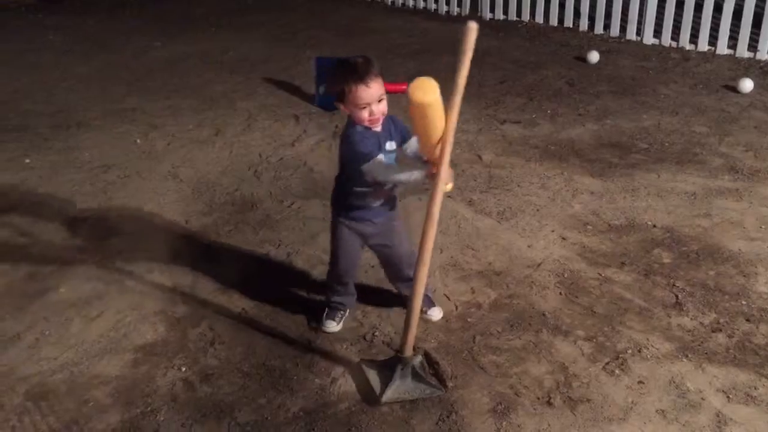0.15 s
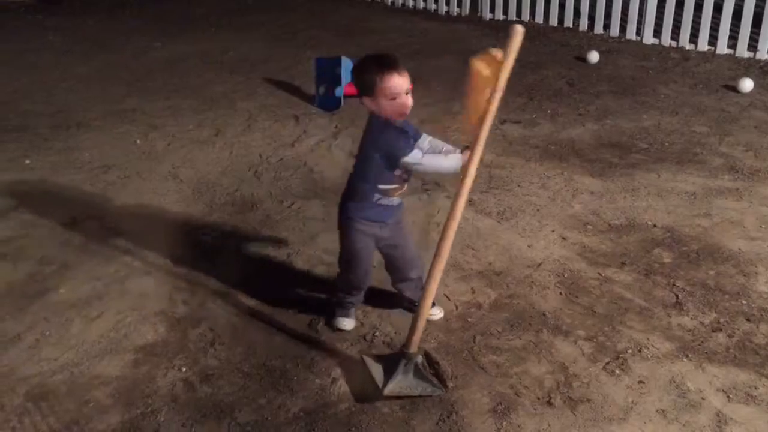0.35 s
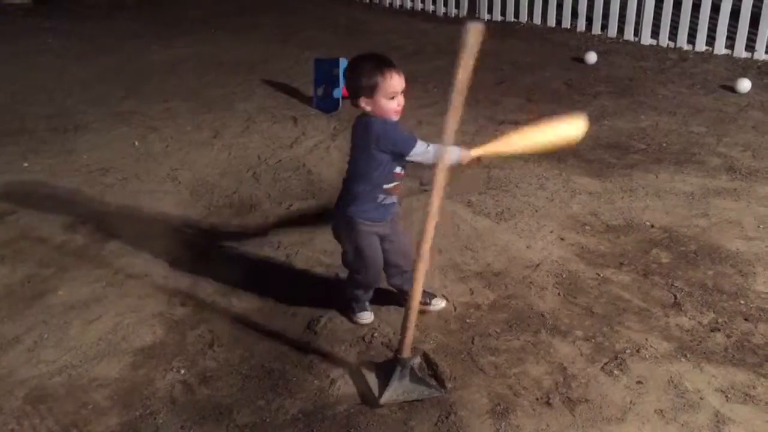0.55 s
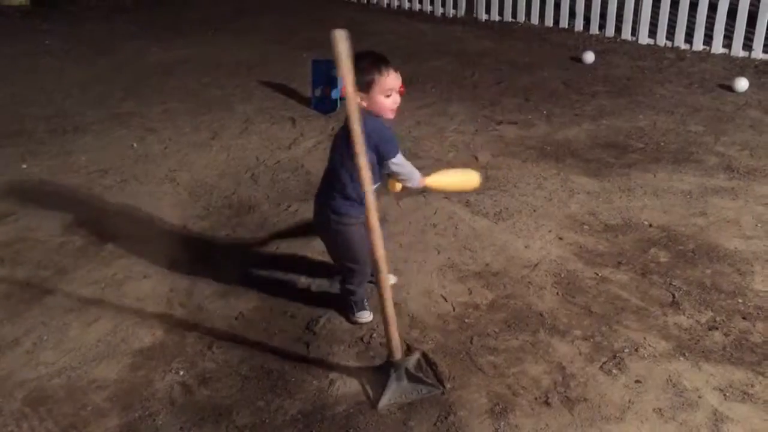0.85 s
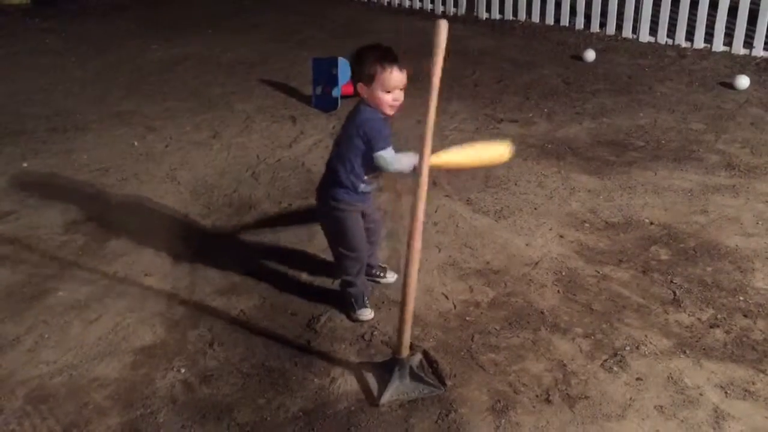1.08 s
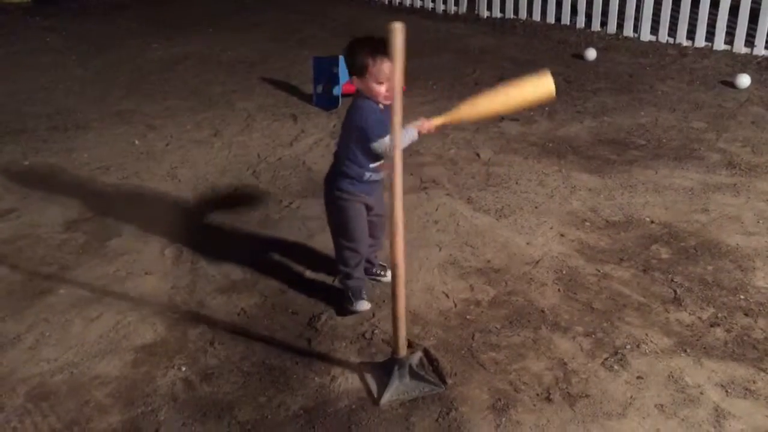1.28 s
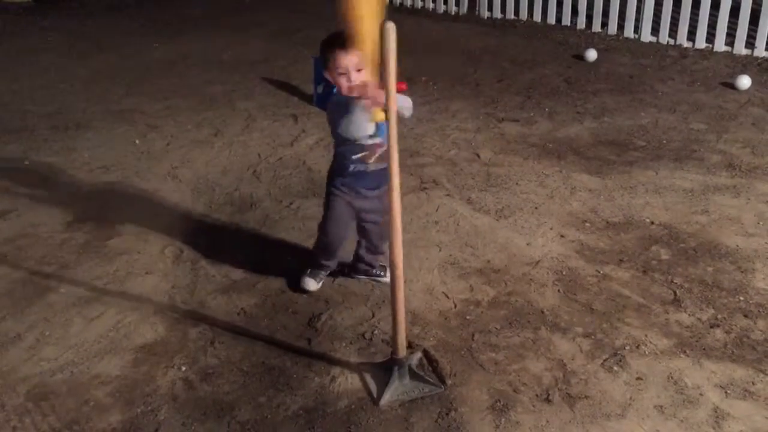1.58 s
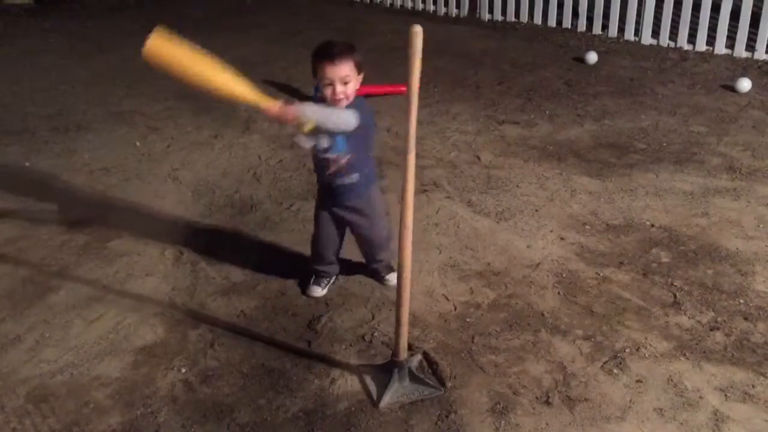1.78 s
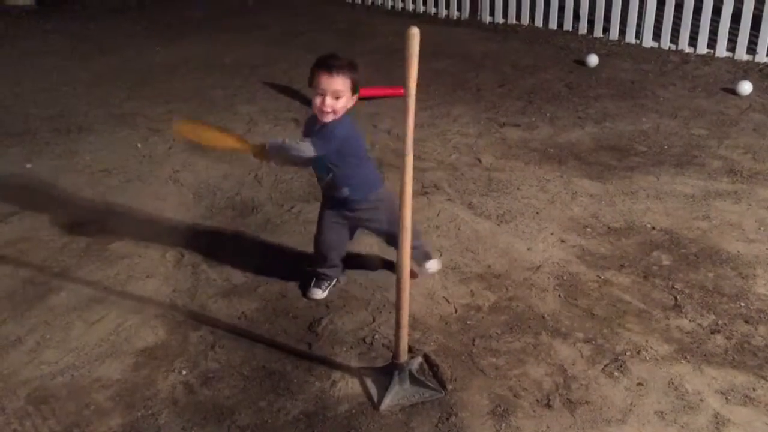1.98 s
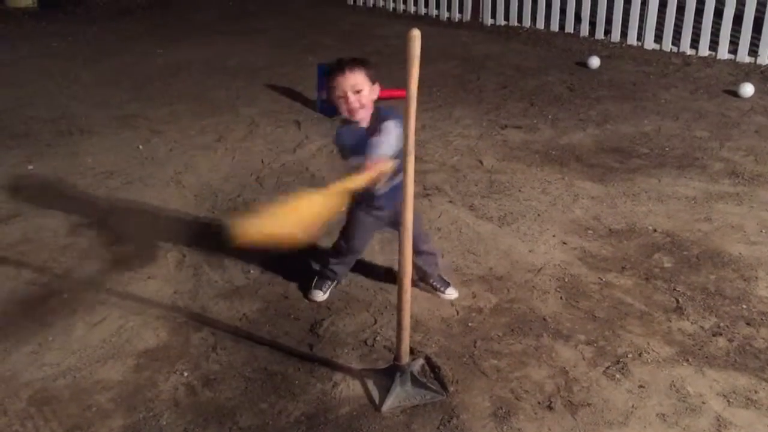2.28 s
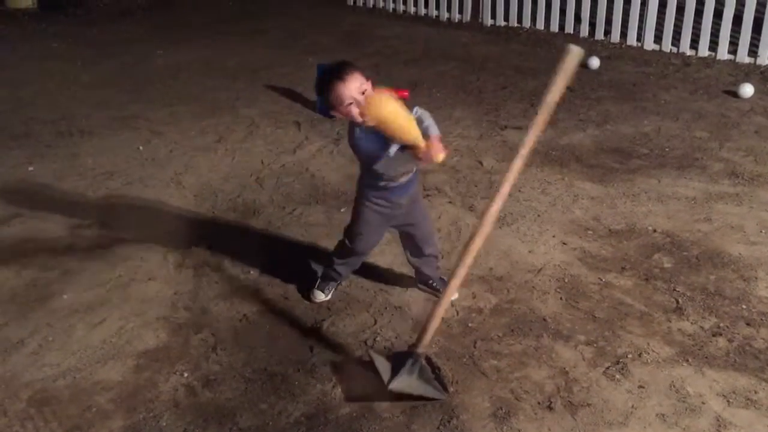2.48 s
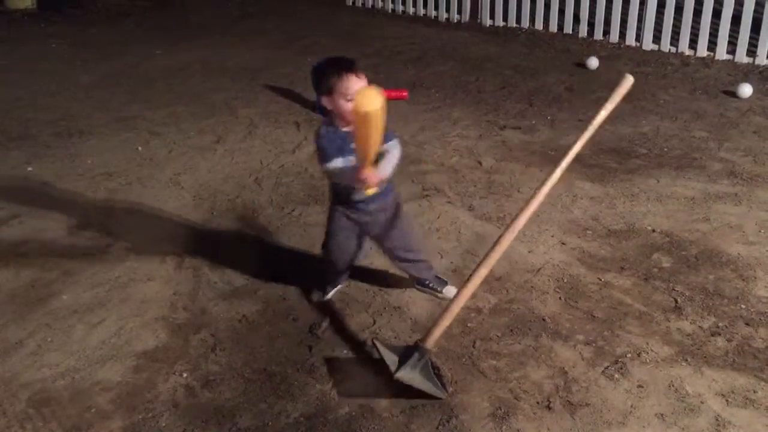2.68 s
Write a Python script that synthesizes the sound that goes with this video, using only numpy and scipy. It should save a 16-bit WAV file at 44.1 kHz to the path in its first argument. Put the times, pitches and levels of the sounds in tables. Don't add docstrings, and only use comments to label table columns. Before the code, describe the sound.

Quiet rubbing and wooden knocks, then one loud sharp plastic bat whack on a rattling wooden pole.

```python
import sys
import numpy as np
from scipy import signal
from scipy.fft import rfft, irfft
from scipy.io import wavfile
from scipy.ndimage import uniform_filter1d

SR = 44100
rng = np.random.default_rng(int(sys.argv[2]) if len(sys.argv) > 2 else 0)


def unload_wav(signal):
    wavfile.write(
        sys.argv[1],
        SR,
        np.round(np.clip(np.atleast_2d(signal).T, -1, 1) * 32767).astype(np.int16),
    )


def volts_from_db(level):
    exponent = np.asarray(level, float) / 20
    return 10 ** exponent


N = 125685
TIME = np.arange(N) / SR
SILENT_DB = -110


def read(points, hz):
    f, value = np.transpose(points)
    return np.interp(np.log(hz + 1), np.log(f + 1), value)


def evened(x):
    return x / np.sqrt(np.mean(x ** 2) + 1e-20)


def add(mix, s, sound):
    part = mix[round(s * SR):][:len(sound)]
    part += sound[:len(part)]


def high_pass(x, order, hz):
    return signal.sosfilt(signal.butter(order, hz, "high", fs=SR, output="sos"), x)


def noise(shape_db, size, patchy_db, flicker_db):
    frames = 4 * N // size + 5
    hz = np.fft.rfftfreq(size, 1 / SR)[:, None]
    real, imag, patches = rng.standard_normal((frames, len(hz), 3)).T
    patches = uniform_filter1d(uniform_filter1d(patches, size=3, axis=0), size=9, axis=1)
    patches = evened(patches)
    flicker = evened(uniform_filter1d(rng.standard_normal(frames), size=3))
    gain = volts_from_db(shape_db(hz, np.arange(frames) * size / 4 / SR) + 0 * patches)
    gain = gain / np.sqrt((gain ** 2).mean(0))
    gain = gain * volts_from_db(patchy_db * patches + flicker_db * flicker)
    sound = signal.istft((real + 1j * imag) * gain, nperseg=size, noverlap=3 * size // 4)[1]
    return evened(sound[:N])


def puff(db, hz, t60, narrow_db, rise):
    t, f = np.arange(8192) / SR, np.fft.rfftfreq(8192, 1 / SR)
    band = volts_from_db(-narrow_db * np.log2((f + 1) / hz) ** 2)
    hiss = evened(irfft(rfft(rng.standard_normal(8192)) * band))
    return hiss * volts_from_db(db - 60 * t / t60) * np.minimum(t / (rise + 1e-4), 1)


def ring(modes, gain_db, contact_ms, share, bend):
    hz, db, t60 = np.transpose(modes)[..., None]
    t = np.arange(SR // 4) / SR
    detune, phase, mate_detune, mate_phase = rng.random((4, len(modes), 1))
    decay_db = 60 * (t / np.maximum(share * t60, .003)) ** bend
    onset = 1 - np.exp(-t / (contact_ms / 1000 + 1e-4))
    fade = volts_from_db(db + gain_db(hz) - decay_db) * onset
    main_hz = hz * (1 + 0.0095 * (detune - .5))
    mate_hz = hz * (1 + 2 * 0.0335 * (2 * mate_detune - 1))
    main = np.sin(2 * np.pi * (main_hz * t + phase))
    mate = np.sin(2 * np.pi * (mate_hz * t + mate_phase))
    return (fade * (main + volts_from_db(-8) * mate)).sum(0)


# f/Hz, level/dB, t60/s
BAT_MODES = [(412, -6.5, 0.023), (842, -5.5, 0.036), (1175, -7, 0.05), (1576, -2.5, 0.076),
             (2100, -1, 0.0478), (2464, -0.5, 0.023), (3560, 2.5, 0.014), (4760, -22.5, 0.0092),
             (5280, -2.5, 0.00693), (6000, -10.5, 0.0056), (7170, -14, 0.012), (8300, -12, 0.012),
             (10670, -25.5, 0.0033), (13600, -23.5, 0.0079)]
# t/s, shell level/dB, crack level/dB, tilt/dB per octave
BLOWS = [
    (2.4751, -13.5, 3.5, -3),
    (2.481, -18.5, -24, -3.5),
    (2.4938, -13, -23, 0.5),
    (2.4974, -21, -17.5, 2.5),
    (2.514, -27.5, -27.5, -4.5),
    (2.5182, -22, -26.5, 2.5),
    (2.528, -35, -35, 2),
]
# f/Hz, level/dB
CRACK_COLOUR = [(200, -44), (600, -24.5), (1500, -19), (3900, -10), (5800, 8), (7500, -5.5), (10500, -14),
                (13500, -10.5), (16500, -17)]


def bat():
    out, t = np.zeros(N), np.arange(2048) / SR
    colour_db = read(CRACK_COLOUR, np.abs(np.fft.fftfreq(2048, 1 / SR)))
    snap = np.fft.ifft(np.exp(np.conj(signal.hilbert(np.log(volts_from_db(colour_db)))))).real
    snap = snap[:400] / np.linalg.norm(snap) / 2
    crack_t60, snap_db = .0055, 15
    for s, shell_db, crack_db, tilt in BLOWS:
        shell_gain = lambda f: shell_db + tilt * np.log2(f / 2000)
        add(out, s, ring(BAT_MODES, shell_gain, contact_ms=0.23, share=0.85, bend=0.99))
        hiss = evened(irfft(rfft(rng.standard_normal(2048)) * volts_from_db(colour_db[:1025])))
        add(out, s, hiss * volts_from_db(crack_db - 6 - 60 * t / crack_t60) * np.minimum(t / 0.0005, 1))
        add(out, s + .0003, volts_from_db(crack_db + snap_db) * snap)
    return out


# f/Hz, level/dB, t60/s
POLE_MODES = [(143.5, -7, 0.068), (318, -1.5, 0.074), (621, -1, 0.093), (781, -7, 0.063),
              (1122, -0.5, 0.074), (1650, -3.5, 0.073), (1979, -7, 0.072), (2242, 2, 0.048),
              (2418, -8.5, 0.04), (2920, 0.5, 0.037), (3640, -3, 0.031), (4255, -3, 0.033),
              (5140, 0, 0.017), (6400, 0, 0.05)]
# t/s, level/dB, best excited f/Hz, spread/octaves, share of free ring time
KNOCKS = [(0.411, -53, 900, 0.55, 1), (.462, -40.5, 2300, .6, 0.79), (.488, -49, 2200, 0.56, 0.32),
          (0.731, -52, 2520, 0.46, 0.55), (0.772, -51, 2100, 0.64, 0.66), (0.7848, -38, 1390, 0.98, .5),
          (0.799, -42.5, 310, 0.58, 0.99), (.797, -55.5, 3860, 0.53, 0.74), (0.804, -52, 1900, 0.71, 0.4),
          (0.822, -40, 2920, 0.18, 0.74), (.836, -49.5, 1600, 0.27, 0.26), (.847, -38.5, 2900, 0.23, 0.44),
          (1.035, -66, 2110, 0.7, 0.67), (1.0794, -65, 2100, 0.36, 0.8), (1.387, -58, 1600, 0.34, 1.8),
          (1.407, -60, 655, 1.1, 0.64), (1.543, -65, 1930, 0.22, 0.7), (2.477, -20, 1800, 0.9, 0.81),
          (2.4935, -5.5, 2100, 0.83, 0.28), (2.504, -23, 1470, 1.17, 0.83), (2.514, -26.5, 2850, 0.82, 1.2),
          (2.52, -14.5, 1650, 0.14, 0.91), (2.538, -24, 1650, 0.31, .5), (2.552, -38, 2000, 0.31, .6),
          (2.531, -36.5, 318, 0.28, 1.82), (2.559, -32, 159, 0.6, 1.03), (2.585, -38, 250, 0.71, 0.81),
          (2.616, -48, 330, .4, 0.79), (2.657, -47.5, 1900, 0.46, .6), (2.672, -45, 130, 0.48, 1.3),
          (2.706, -51, 1800, 0.2, 1.4), (2.745, -51, 2000, .3, 0.41),]


def pole():
    out, t = np.zeros(N), np.arange(600) / SR
    for s, db, hz, spread, share in KNOCKS:
        chatter = rng.standard_normal(600) * np.exp(-t / .004) * .025
        chatter[0] = 1
        place_gain = lambda f: db - 6 * (np.log2(f / hz) / spread) ** 2
        wood = ring(POLE_MODES, place_gain, contact_ms=3.44, share=share, bend=1.64)
        add(out, s, signal.fftconvolve(wood, chatter))
    return out


# t/s, level/dB
JUDDER = [
    (2.49, -30.5),
    (2.528, -33.5),
    (2.56, -46.5),
    (2.6, -63),
    (2.64, -60.5),
    (2.68, -61),
    (2.72, -61.5),
    (2.78, -70),
    (2.85, -66),
]
# f/Hz, level/dB
JUDDER_REACH = [(100, 9), (330, 2.5), (650, -12), (1100, -3.5), (1900, 3), (3000, -5), (6500, -7)]


def judder():
    s, db = np.transpose(JUDDER)
    jolts_per_s = 900
    jolts = rng.standard_normal(N) * volts_from_db(2.37 * rng.exponential(1, N))
    jolts = jolts * (rng.random(N) < jolts_per_s / SR)
    body = ring(POLE_MODES, lambda f: read(JUDDER_REACH, f), contact_ms=0.55, share=0.61, bend=0.88)
    level = volts_from_db(np.interp(TIME, s, db, left=SILENT_DB))
    return signal.fftconvolve(evened(jolts) * level, body / np.linalg.norm(body))[:N]


# start t/s, length/s, level/dB, from f/Hz, to f/Hz
ROCK = (.755, .065, -51, 150, 315)


def rock():
    s, length, db, low_hz, top_hz = ROCK
    out, u = np.zeros(N), np.arange(0, 1, 1 / (SR * length))
    hz = low_hz + (top_hz - low_hz) * np.minimum(u / 0.553, 1)
    add(out, s, volts_from_db(db) * np.sin(np.pi * u) * np.sin(2 * np.pi * np.cumsum(hz) / SR))
    return out


# t/s, level/dB
SPILL = [
    (2.477, -11),
    (2.499, -25),
    (2.529, -30),
    (2.559, -38),
    (2.6, -44.5),
    (2.661, -51),
    (2.69, -56),
    (2.72, -54.5),
    (2.85, -63),
]
# f/Hz, level/dB
RATTLE_COLOUR = [(35, -59), (90, -34.5), (150, -8), (400, -13), (700, -14), (1100, -5), (3580, -10.5),
                 (16000, -52)]
# f/Hz, level/dB
SOIL_COLOUR = [(50, -13.5), (100, -1.5), (320, -8), (720, -26), (1200, -9), (1850, 1), (3500, -9),
               (6500, -14.5)]


def spill():
    s, db = np.transpose(SPILL)
    settle_s, dull_hz, dull_db_per_octave = 0.12, 6500, -29.5

    def colour(hz, t):
        late = 1 - np.exp(-np.maximum(t - s[0], 0) / settle_s)
        soil = read(SOIL_COLOUR, hz) + dull_db_per_octave * np.log2(np.maximum(hz / dull_hz, 1))
        return read(RATTLE_COLOUR, hz) * (1 - late) + soil * late

    dirt = noise(colour, size=512, patchy_db=1.5, flicker_db=1.5)
    return dirt * volts_from_db(-2 + np.interp(TIME, s, db, left=SILENT_DB))


# t/s, level/dB, tilt/dB per octave
SLIDE = [(0, -63, 0), (.06, -62.5, 4.5), (.11, -59, -0.5), (.155, -53.5, -2), (0.203, -59.5, 1.5),
         (.225, -67, -2), (.27, -64, -1.5), (.33, -63.5, -1), (0.359, -55.5, 1.5), (0.4, -52, 2.5),
         (0.419, -46, 0.5), (0.448, -50, -0.5), (0.467, -43, 1.5), (0.489, -47, -0.5), (0.5, -60.5, -0.5),
         (0.551, -70.5, -3.5)]
# f/Hz, level/dB
RUB_COLOUR = [(71, -34), (120, -22), (184, 3), (427, -7.5), (503, -23.5), (1030, -7.5), (2290, -3.5),
              (5990, -14.5), (16000, -29)]
# f/Hz, width/Hz, level/dB
RUB_PEAKS = [(397, 67, 8), (739, 110, 17.5), (1067, 72, 8.5), (1800, 87, 8), (2350, 280, 2),
             (3600, 97, 9.5), (4530, 230, 1), (5900, 840, 10.5), (9000, 490, 5.5)]


def slide():
    s, db, tilt = np.transpose(SLIDE)

    def colour(hz, t):
        peaks = sum(d * np.exp(-((hz - f) / w) ** 2) for f, w, d in RUB_PEAKS)
        lean = np.interp(t, s, tilt) * np.log2(hz / 2000 + 0.025)
        return read(RUB_COLOUR, hz) + peaks + lean

    rub = noise(colour, size=512, patchy_db=4.0, flicker_db=1.03)
    grain = evened(uniform_filter1d(rng.standard_normal(N), size=70))
    return rub * volts_from_db(-0.17 * grain + np.interp(TIME, s, db, right=SILENT_DB))


# t/s, level/dB, f/Hz
TICKS = [(.008, -74, 9000), (0.016, -50, 13000), (0.023, -48, 13100), (.041, -74, 13000),
         (0.091, -46.5, 6500), (.119, -56, 12000), (0.144, -48, 6000), (.174, -47, 13300),
         (.183, -54, 14000), (.41, -52, 6200), (.489, -48, 8000), (.85, -59, 9000), (2.54, -40, 8060),
         (2.556, -43, 7000), (2.568, -47.5, 7960), (2.578, -37.5, 6900), (2.595, -39, 7000),
         (2.66, -47.5, 6000), (2.726, -52, 5070)]


def grit():
    out = np.zeros(N)
    for s, db, hz in TICKS:
        add(out, s, puff(db, hz, t60=0.011, narrow_db=26, rise=0.0015))
    return out


# t/s, level/dB, f/Hz, t60/s, rise/s
SCUFFS = [
    (0.594, -61.5, 1280, 0.088, 0.0033),
    (0.766, -63.5, 2440, 0.27, 0.015),
    (0.786, -48.5, 540, 0.081, 0.0023),
    (2.255, -60, 514, 0.13, 0.002),
    (2.4516, -54.5, 2100, 0.06, .002),
    (2.462, -47, 505, 0.27, .004),
]


def scuffs():
    out = np.zeros(N)
    for s, db, hz, t60, rise in SCUFFS:
        add(out, s, puff(db, hz, t60, 3.4, rise))
    return out


# t/s, level/dB, f/Hz, t60/s, rise/s
TOUCHES = [
    (.5, -59, 395, 0.21, 0.0056),
    (.873, -67.5, 900, 0.056, 0.0032),
    (1.5, -73, 1850, .25, .02),
    (1.81, -78, 2150, 0.13, .01),
    (1.93, -71.5, 1900, .3, 0.026),
    (1.96, -73, 2350, .15, .01),
    (2.09, -72, 2000, .15, 0.0081),
    (2.275, -68, 2050, 0.24, 0.013),
    (2.81, -64, 944, 0.16, .01),
    (2.82, -59.5, 1980, 0.19, .01),
]


def touches():
    out = np.zeros(N)
    for s, db, hz, t60, rise in TOUCHES:
        add(out, s, puff(db, hz, t60, 220, rise))
    return out


def yard(x):
    t60 = 0.19
    taps = np.zeros(SR // 2)
    at = np.arange(200, len(taps) - 20, 20)
    taps[at + rng.integers(0, 20, len(at))] = rng.choice([-1., 1.], len(at))
    taps = taps * volts_from_db(-60 * np.arange(len(taps)) / SR / t60)
    taps = signal.lfilter([1], [1, -.4], taps)
    return signal.fftconvolve(x, taps / np.linalg.norm(taps))[:N]


# f/Hz, level/dB
AIR_COLOUR = [(20, -21.5), (60, 0.5), (160, -5.5), (400, -20), (850, -17.5), (2700, -26.5), (6000, -30.5),
              (15500, -39)]


def air():
    return volts_from_db(-66.5) * noise(lambda hz, t: read(AIR_COLOUR, hz), size=2048, patchy_db=1.2, flicker_db=0)


def scene():
    hits = high_pass(bat() + pole() + judder(), 2, 96) + rock()
    echoes = volts_from_db(-21) * yard(hits)
    small = grit() + scuffs() + touches()
    return (hits + echoes + spill() + slide() + small + air())[None]


def band_limit(x):
    return signal.sosfilt(signal.butter(12, 17130, fs=SR, output="sos"), x)


def record(dry):
    ceiling = 1.1
    x = high_pass(dry, 3, 39.6)
    return band_limit(ceiling * np.tanh(x / ceiling))


dry = scene()
out = record(dry)
unload_wav(out)
```